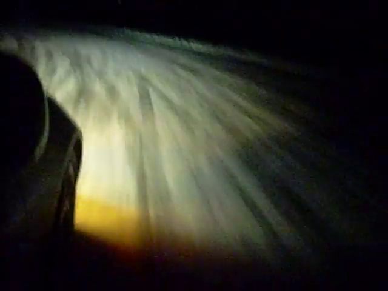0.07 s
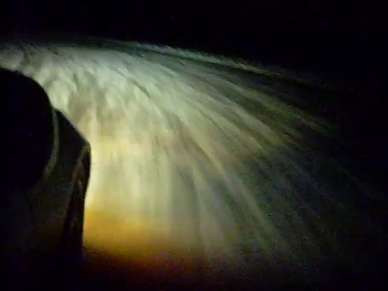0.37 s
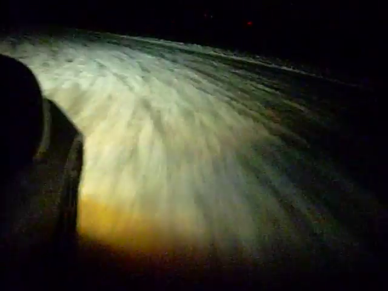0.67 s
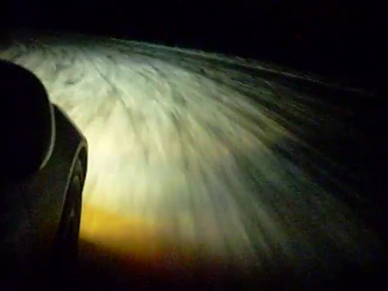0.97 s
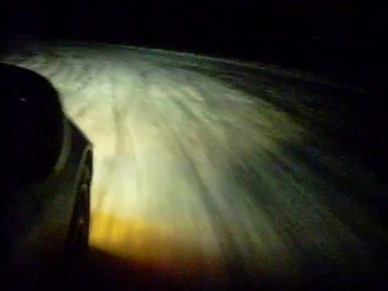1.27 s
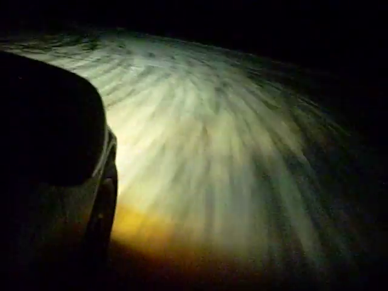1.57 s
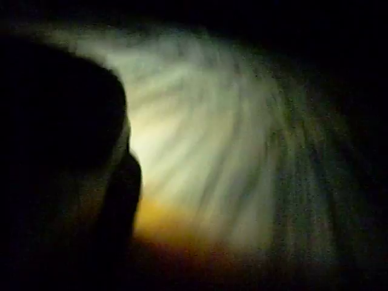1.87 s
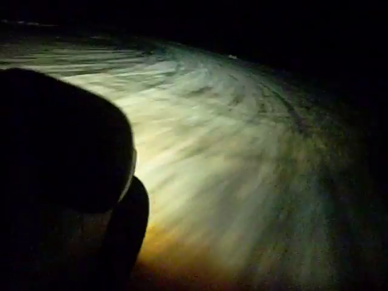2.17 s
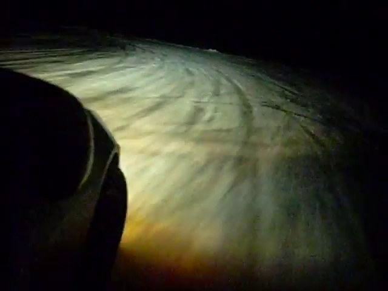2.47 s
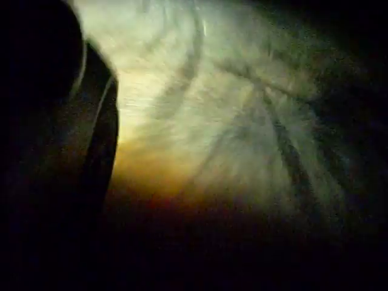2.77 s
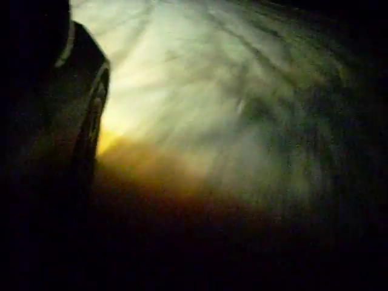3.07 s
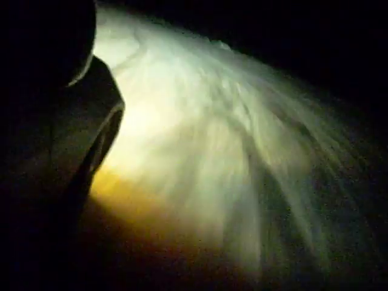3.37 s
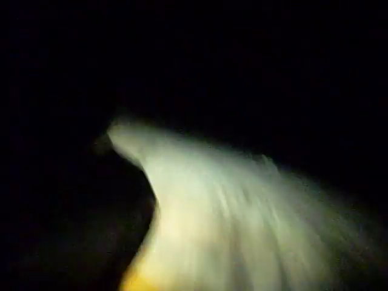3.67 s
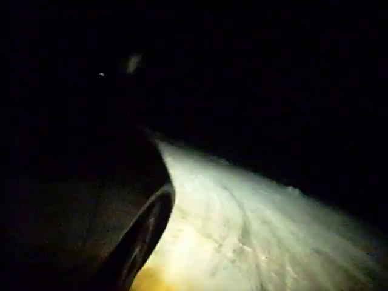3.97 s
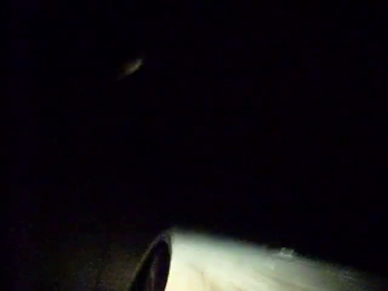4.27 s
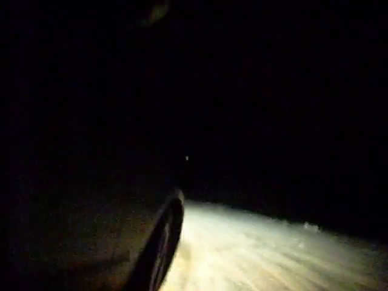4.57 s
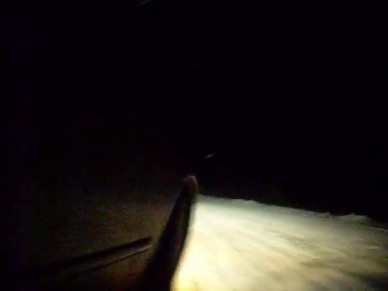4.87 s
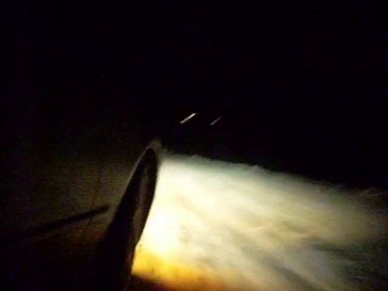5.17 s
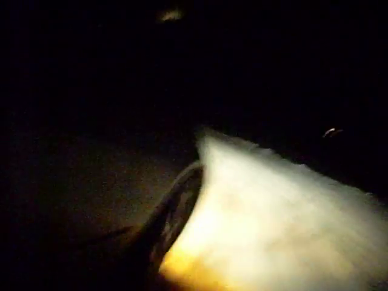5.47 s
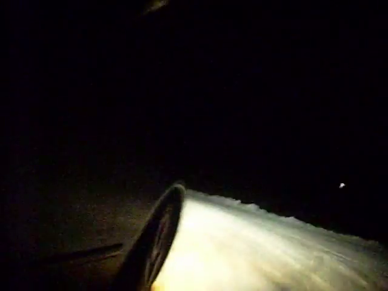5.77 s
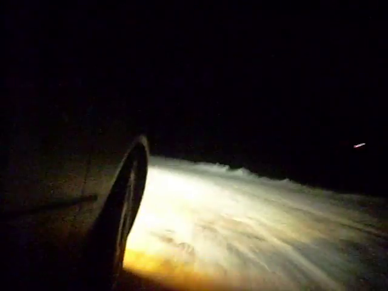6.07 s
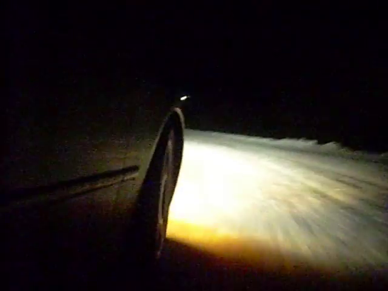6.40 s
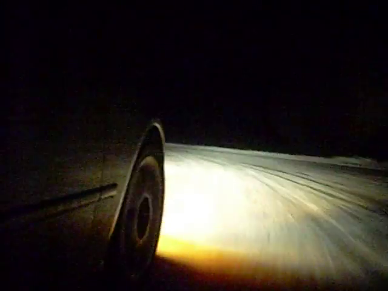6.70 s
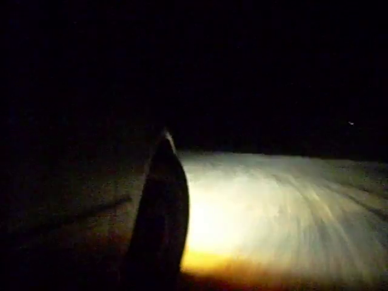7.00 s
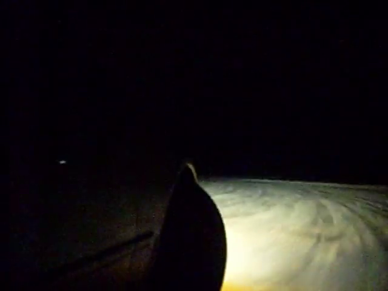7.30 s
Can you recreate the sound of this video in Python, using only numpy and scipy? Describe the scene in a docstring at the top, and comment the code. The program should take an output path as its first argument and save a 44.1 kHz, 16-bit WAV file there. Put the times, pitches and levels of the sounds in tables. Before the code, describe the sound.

A car slides over an ice track, heard close up through a small, slightly dull microphone outside the window. Gusty wind noise opens over the tyres, whose rough, gritty crunch grows louder as the wind drops. Past the halfway point the tyres ease and low buffeting takes over, with rapid, uneven, sometimes distorted thumps. These grow sparser, and a few short scrapes on the ice come at the end.

```python
"""Wind tears across a microphone over the roar and crunch of tyres sliding on ice.
It is a small camera held out of a car window on an ice track at night. The tyres drum on the ice,
crush it and spray grit. The rush of air fades after a second and a half. Later, single swirls of air
(vortices) off the car body thump against the microphone, and the strongest overload it."""
import sys
import numpy as np
from scipy import signal
from scipy.fft import rfft, irfft, next_fast_len
from scipy.io import wavfile
from scipy.ndimage import uniform_filter1d

SR = 44100
rng = np.random.default_rng(int(sys.argv[2]) if len(sys.argv) > 2 else 0)


def unload_audio(sound):
    """Save the sound as a 16-bit wav file, at the path given as the first command line argument."""
    columns = np.transpose(np.atleast_2d(sound))
    # keep every value between -1 and 1, then stretch to whole-number steps
    steps = np.round(np.clip(columns, -1, 1) * 32767)
    wavfile.write(sys.argv[1], SR, steps.astype(np.int16))


N = 332514
TIME = np.arange(N) / SR

# how rough the air is behind the car body: t/s, level/dB
TURBULENCE = [(0, -56), (3.7, -47), (4.2, -39), (4.65, -26), (5.1, -22.5), (5.4, -36.5), (5.9, -41),
              (6.2, -32.5), (6.8, -40.5), (7.1, -52)]


def undb(db):
    """Turn decibels into a number to multiply by."""
    return 10 ** (np.asarray(db) / 20)


def curve(rows):
    """Join a table's (time, value) points with straight lines, one value per sample."""
    return np.interp(TIME, *np.transpose(rows))


def colour(x, spectrum):
    """Give x the tone of a (f/Hz, level/dB) table; the result has an average (rms) size of 1."""
    hz, db = np.transpose(spectrum)
    size = next_fast_len(N // 2 + 4096) * 2
    f = np.maximum(np.arange(size // 2 + 1) * SR / size, 1)
    gain = undb(np.interp(np.log(f), np.log(hz), db))
    # fold the filter so that it rings only after each click, never before
    cepstrum = irfft(np.log(gain))
    cepstrum[1:size // 2] *= 2
    cepstrum[size // 2 + 1:] = 0
    y = irfft(rfft(x - x.mean(), size) * np.exp(rfft(cepstrum)))[:N]
    return y / y.std()


def wander(rate):
    """Smooth random motion with about `rate` turns a second and a spread of 1."""
    hold = max(int(SR / rate), 1)
    steps = np.repeat(rng.standard_normal(N)[:N // hold + 1], hold)[:N]
    y = uniform_filter1d(steps, hold)
    return y / y.std()


def clicks(rate, spread_db):
    """Clicks of uneven size at random moments, about `rate` a second."""
    return (rng.random(N) < rate / SR) * undb(spread_db * rng.standard_normal(N))


def cut_bass(x, hz):
    """Gently weaken everything below `hz`."""
    return signal.sosfilt(signal.butter(1, hz, "high", fs=SR, output="sos"), x)


def airflow(rise_s=0.019, fade_s=0.025):
    """Strength of the air on the microphone: a long stream, then gusts that rise, hold and die away."""
    # air blowing straight onto the microphone: t/s, relative level/dB
    stream = [(0, -23), (.03, -16.5), (.15, -13), (.23, -17.5), (.33, -12), (.39, -13.5), (.43, -20),
              (.49, -13.5), (.66, -18), (.79, -18), (.91, -14), (1.05, -18), (1.26, -15), (1.335, -17.5),
              (1.39, -27), (1.54, -37.5)]
    # short gusts: t/s, length/s, relative level/dB
    gusts = [(1.834, 0.053, -30), (2.79, 0.075, -29), (2.961, .11, -31.5), (5.277, 0.05, -23)]
    fade_after = lambda end: np.exp(-np.maximum(TIME - end, 0) / fade_s)
    strength = undb(curve(stream) - 3) * fade_after(stream[-1][0])
    for start, length, db in gusts:
        rise = np.clip((TIME - start) / rise_s + 1, 0, 1)
        strength += undb(db) * rise * fade_after(start + length)
    return strength


def heaving_air():
    """Rough air behind the car and the air on the microphone make a very deep rumble."""
    # tone of the rumble: f/Hz, level/dB
    air_tone = [(12, -3), (30, -4), (60, -9), (120, -16.5), (300, -20), (1000, -58)]
    strength = undb(curve(TURBULENCE)) + undb(-15) * airflow()
    return colour(rng.standard_normal(N), air_tone) * strength


def wheel_arch(x):
    """The hollow around the tyre rings at a few pitches."""
    # its ringing pitches: f/Hz, width/Hz, added level/dB
    pitches = [(637, 28, -10.5), (840, 49, -11.5), (1294, 200, -3.5), (1520, 62, -10.5)]
    return x + sum(undb(db) * signal.lfilter(*signal.iirpeak(hz, hz / width, fs=SR), x)
                   for hz, width, db in pitches)


def tyres():
    """Tread blocks drum on the ice and crush its ridges; loose grit sprays against the wheel arch."""
    # how hard the tyres rub over the ice: t/s, level/dB
    rubbing = [(0.0, -36.5), (0.04, -35.5), (0.46, -36), (0.52, -32.5), (0.71, -37), (0.86, -28.5),
               (1.11, -32.5), (1.19, -27.5), (1.43, -32), (1.91, -29), (2.14, -31), (2.52, -26),
               (2.79, -31), (2.86, -25), (4.22, -37), (5.56, -41), (6.61, -39), (6.97, -44), (6.99, -38.5),
               (7.2, -46.5), (7.41, -38), (7.54, -44.5)]
    # louder scrapes as they bite into rougher ice: t/s, half-length/s, boost/dB
    scrapes = [(2.384, 0.01, 0), (2.715, 0.022, 3.5), (3.142, .025, 2.5), (3.97, 0.043, 4),
               (4.354, 0.028, 3.5), (6.37, .06, 1.5), (6.652, 0.063, 1.5), (7.013, .03, 4.5),
               (7.137, .04, 4.5), (7.48, .025, 5.5)]
    # how far the treble stands out over the body of the sound: t/s, relative level/dB
    treble = [(0, -5.5), (0.6, -3), (1.2, 0.5), (1.5, 2.5), (2.5, 3.5), (3.1, 1.5), (3.8, -2.5),
              (4.5, -2.5), (5.4, -0.5), (6.3, -1.5), (6.9, 1), (7.3, 1)]
    # tones of the four parts of the sound: f/Hz, level/dB
    roar_tone = [(100, -16.5), (300, -13), (500, -9.5), (800, -3.5), (1020, -2.5), (1300, -3.5), (1800, -3),
                 (2200, -8.5), (3200, -26), (6000, -25)]
    crunch_tone = [(150, -15.5), (500, -16.5), (1000, -6.5), (1600, -4.5), (2050, -0.5), (2800, -2.5),
                   (3600, -9.5), (5500, -17), (7000, -40.5)]
    grit_tone = [(600, -15.5), (2000, -9.5), (3000, -2), (3700, -1.5), (4500, 1), (5100, 1), (6000, -0.5),
                 (7000, -42)]
    rumble_tone = [(30, 0), (90, 0), (160, -6), (250, -1), (400, 1.5), (600, 0), (1200, -9.5), (4000, -50)]
    rub_db = curve(rubbing) + 33  # 0 at the usual amount of rubbing
    scrape_db = sum(db * np.exp(-((TIME - s) / half) ** 2 / 2) for s, half, db in scrapes)
    body_db = rub_db - curve(treble)
    # each part grows at its own rate as the tyres rub harder
    roar_db = -28.5 + 0.68 * body_db + scrape_db
    crunch_db = -29.78 + 1.44 * body_db + 0.51 * scrape_db
    grit_db = -31.03 + 1.026 * rub_db + 0.73 * scrape_db
    rumble_db = -40.5 + 0.098 * (grit_db - grit_db.mean())
    ruts_db = 0.81 * wander(45) + 0.4 * wander(12)  # uneven ice shakes roar, crunch and grit together
    chatter_db = wander(170)  # the tread grips and slips
    roar = colour(rng.standard_normal(N), roar_tone) * undb(roar_db + ruts_db + 1.7 * wander(25))
    crunch = colour(clicks(rate=4000, spread_db=3), crunch_tone) * undb(crunch_db + ruts_db + chatter_db)
    grit = colour(clicks(rate=9000, spread_db=4), grit_tone) * undb(grit_db + ruts_db + chatter_db)
    rumble = colour(rng.standard_normal(N), rumble_tone) * undb(rumble_db + 4.2 * wander(22))
    return wheel_arch(roar + crunch + grit) + rumble


def slipstream():
    """Air rushing past the car brings flurries of tiny swirls, each briefly sucking at the microphone."""
    # tone of the rushing air: f/Hz, level/dB
    wind_tone = [(20, -10.5), (80, -1), (170, 1.5), (320, 6), (500, 4.5), (850, 3), (1300, -0.5),
                 (2000, -7.5), (3000, -21), (5500, -31)]
    swirls = -colour(clicks(rate=2200, spread_db=1.5), wind_tone)
    swirls *= undb(0.87 * wander(70) + 1.9 * wander(300))
    # suction grows with the square of the air speed, so strong swirls become sharp downward spikes
    spikes = cut_bass(9 * np.tanh(swirls / 3) ** 2, hz=200)
    return (swirls - undb(-18) * spikes) * airflow() * undb(3)


def stray_vortices(count=200, per_second=11):
    """List weak vortices that leave the car at uneven times, stronger when the air is rougher."""
    gap, size, width = rng.standard_normal((count, 3)).T
    s = np.cumsum(np.exp(0.4 * gap)) / per_second
    suction_db = np.interp(s, *np.transpose(TURBULENCE)) + 7 + 1.5 * size
    core_ms = 1.6 * np.exp(0.29 * width)
    wake_db = suction_db - 16
    rows = np.column_stack([s, suction_db, core_ms, wake_db])
    return list(rows[(s > .1) & (s < TIME[-1])])


def vortex_thumps(wake_lag_ms=1.7):
    """A vortex pushes air ahead of it, sucks hard as its core passes, and trails a churning wake."""
    # the strongest vortices: t/s, relative suction/dB, half-width of the core/ms, relative wake level/dB
    strong_vortices = [(0.294, -15, 0.46, -8), (1.015, -9, 0.7, -12), (4.244, -11, 0.72, -30),
                       (4.313, -14.5, 1.04, -19), (4.413, -10, 3.4, -21.5), (4.496, -12.5, 1.4, -38),
                       (4.57, -5.5, 1.4, -20), (4.613, -12, 2.3, -22), (4.631, -5, 2.5, -5.5),
                       (4.67, -4.5, 1.7, -12.5), (4.717, -4, 1.4, -17), (4.76, -21, 1, -18),
                       (4.797, -14.5, 1.3, -17), (4.841, -8, 1.9, -39), (4.88, -9.5, 2.5, -24),
                       (4.908, -6, 0.59, -15.5), (4.974, -9, 0.66, -16), (5.025, -7.5, 2, -23),
                       (5.076, -5, 0.78, -6.5), (5.105, -10, 2.1, -31), (5.139, -12.5, 1.8, -23),
                       (5.183, -10.5, 0.75, -27), (5.247, -9, 1.5, -13), (5.644, -4.5, 0.9, -9.5),
                       (5.789, -9.5, 2.5, -25), (5.945, -11, 2, -40), (6.002, -15, 1.5, -32),
                       (6.076, -6, 0.36, -10.5), (6.127, -13, 7.9, -27), (6.273, -10.5, 1.6, -34),
                       (6.296, -13.5, 5.4, -22.5), (6.413, -18, 3.9, -30), (6.522, -10.5, 1.4, -26),
                       (6.973, -17.5, 1.1, -31)]
    # tones of the wake and of the flutter around a vortex: f/Hz, level/dB
    wake_tone = [(30, 4), (150, 0.5), (400, 3), (900, 2.5), (1500, -4), (2500, -13), (5500, -41.5)]
    flutter_tone = [(25, -7.5), (80, -3), (150, 2), (300, -6.5), (600, -11.5), (1500, -25.5), (5000, -55)]
    pressure, wake_strength = np.zeros(N), np.zeros(N)
    for s, suction_db, core_ms, wake_db in strong_vortices + stray_vortices():
        near = slice(int((s - .1) * SR), int((s + .1) * SR))
        ms = 1000 * (TIME[near] - s)
        position = ms / core_ms  # 0 as the middle of the core passes
        push = 0.15 * np.exp(-(position / 3 + 1.9) ** 2)
        suction = (1 + position ** 2 / 2) ** -1.6
        behind = position - .8  # just behind the core the air snaps back onto the microphone
        snap = (1 + np.tanh(4 * behind)) / 2 * np.exp(-np.abs(behind) / 1.2)
        pressure[near] += undb(suction_db + 3) * (push - suction + 0.6264 * snap)
        wake_half_ms = 2.28 * core_ms ** 0.42  # wider cores trail longer wakes
        wake_strength[near] += undb(wake_db + 1) * np.exp(-((ms - wake_lag_ms) / wake_half_ms) ** 2 / 2)
    thumps = cut_bass(pressure, hz=17)  # the microphone leaks steady pressure, so each dip swings back
    churn = colour(rng.standard_normal(N), wake_tone)
    churn /= np.sqrt(uniform_filter1d(churn ** 2, size=130))  # evened out, so a wake has no gaps
    # weaker swirls flutter around each vortex
    flutter_strength = undb(-14) * np.sqrt(uniform_filter1d(pressure ** 2, size=2600).clip(0))
    flutter = colour(clicks(rate=500, spread_db=4.5), flutter_tone)
    return thumps + wake_strength * churn + flutter_strength * flutter


def scene():
    """Tyres and wind meet at one microphone."""
    return (tyres() + slipstream() + vortex_thumps() + heaving_air())[None]


def record(dry, band_hz=5400, ceiling=0.72, top_hz=15800):
    """The camera loses the high treble, rounds off the strongest thumps and trims their highest fizz."""
    treble_cut = signal.firwin(91, band_hz, window=("kaiser", 7), fs=SR)
    dull = signal.fftconvolve(dry, treble_cut[None], "same")
    rounded = dull / (1 + (dull / ceiling) ** 12) ** (1 / 12)
    return signal.sosfilt(signal.ellip(8, .2, 70, top_hz, fs=SR, output="sos"), rounded)


dry = scene()
out = record(dry)
unload_audio(out)
```